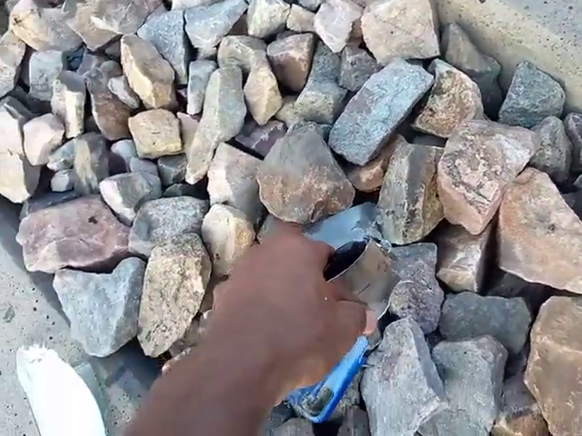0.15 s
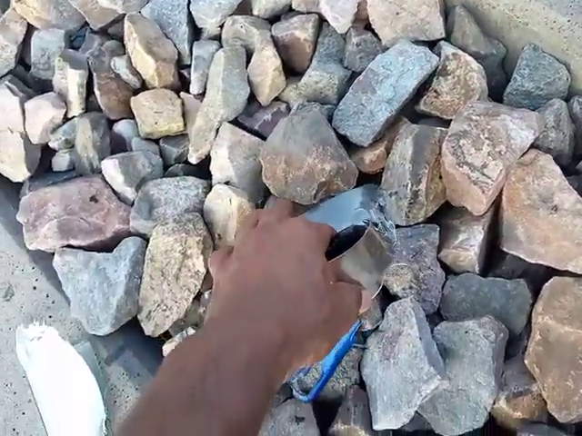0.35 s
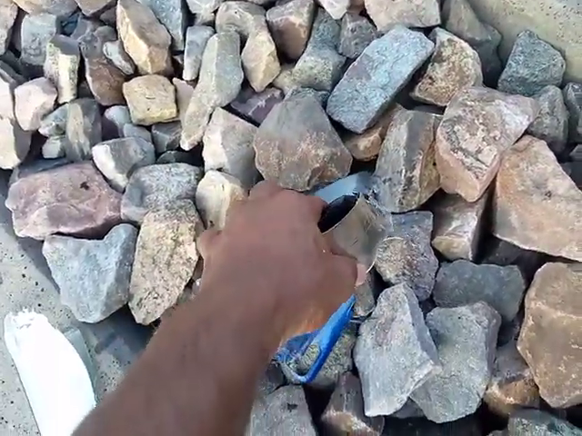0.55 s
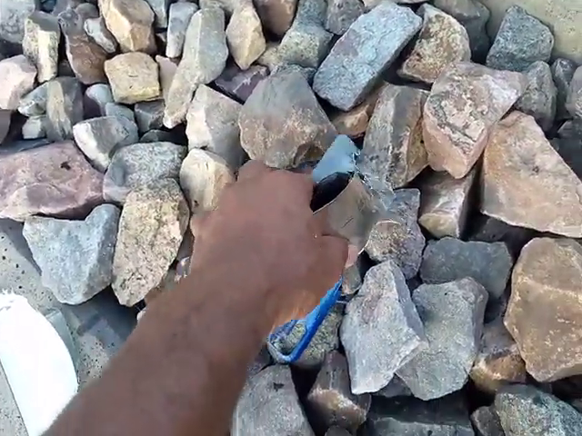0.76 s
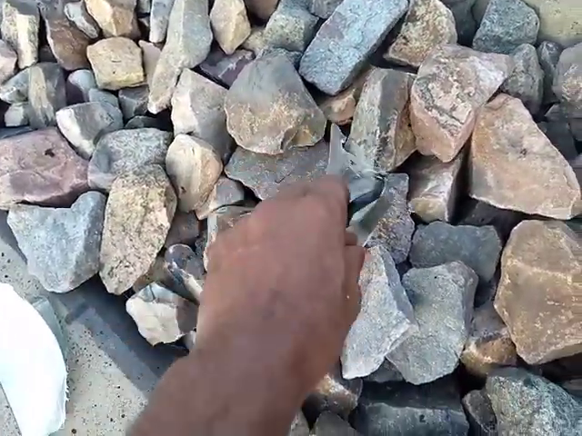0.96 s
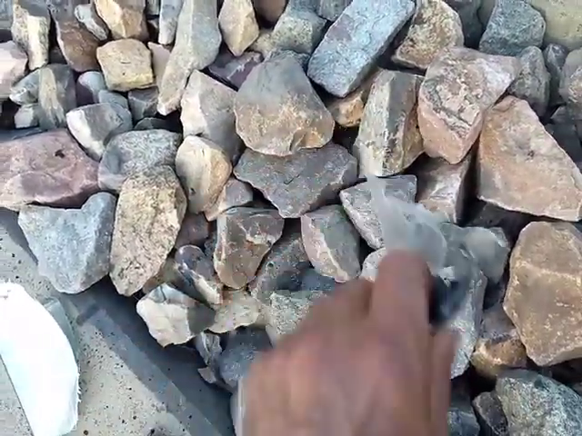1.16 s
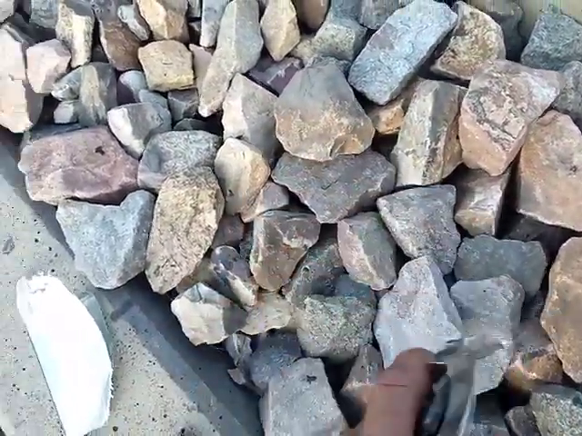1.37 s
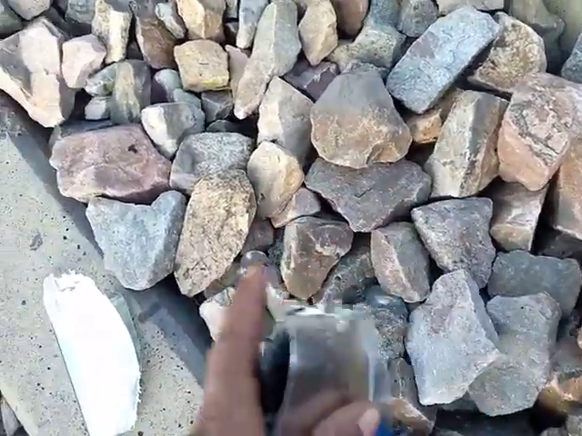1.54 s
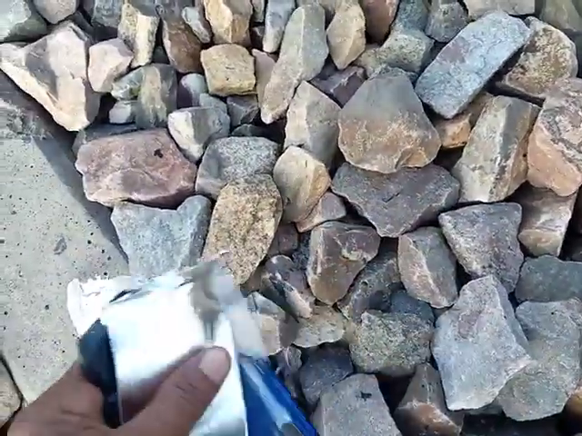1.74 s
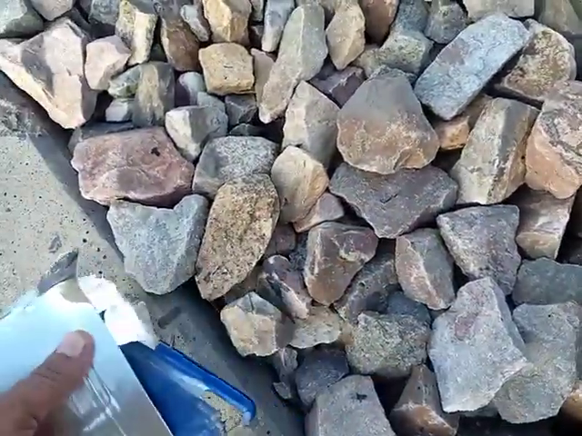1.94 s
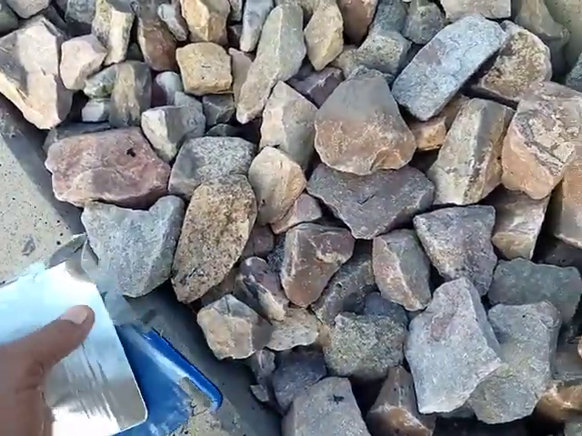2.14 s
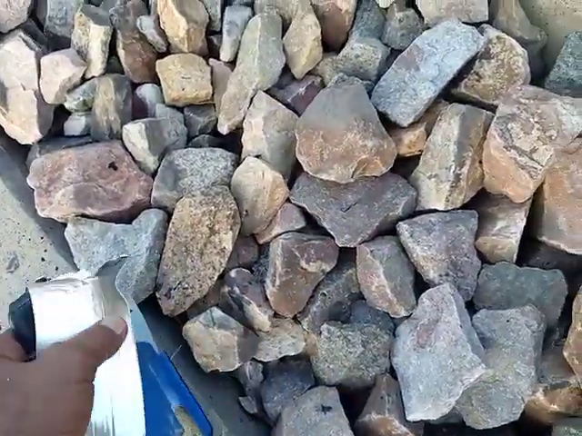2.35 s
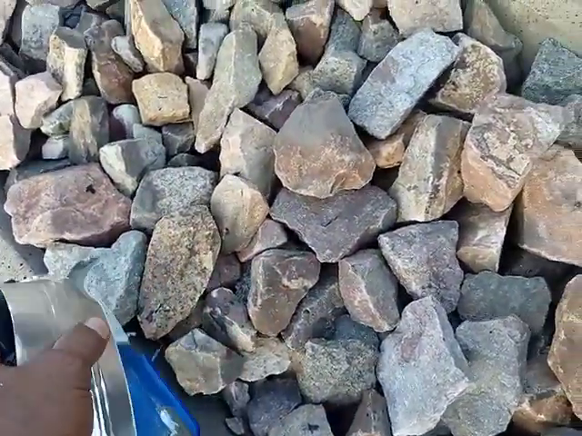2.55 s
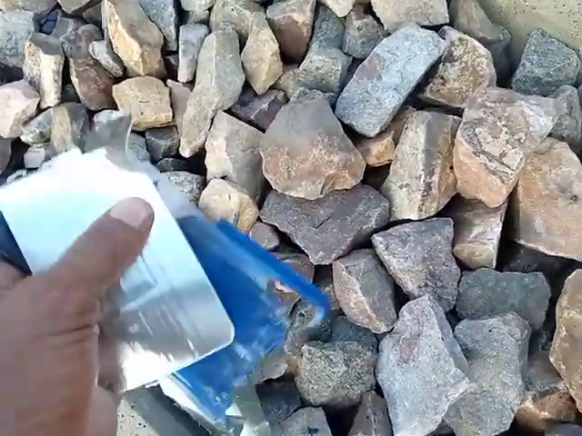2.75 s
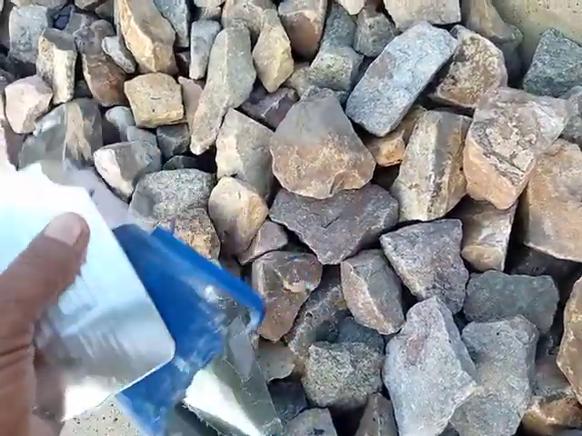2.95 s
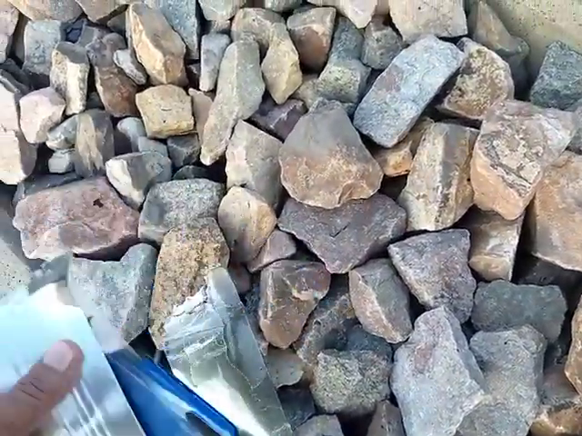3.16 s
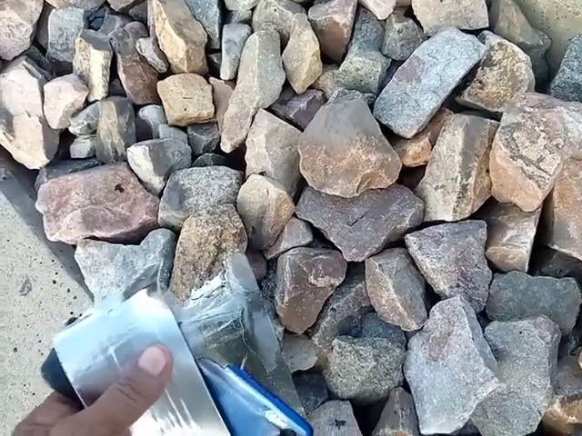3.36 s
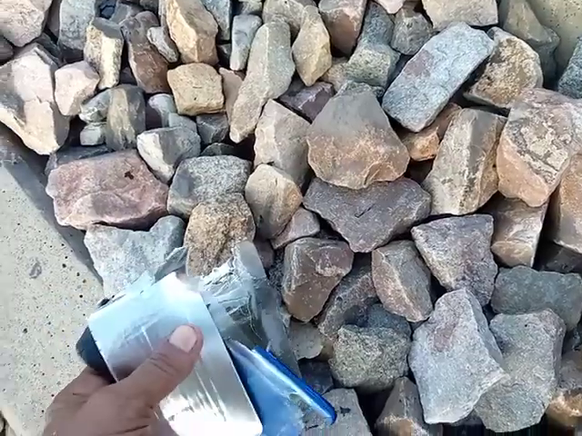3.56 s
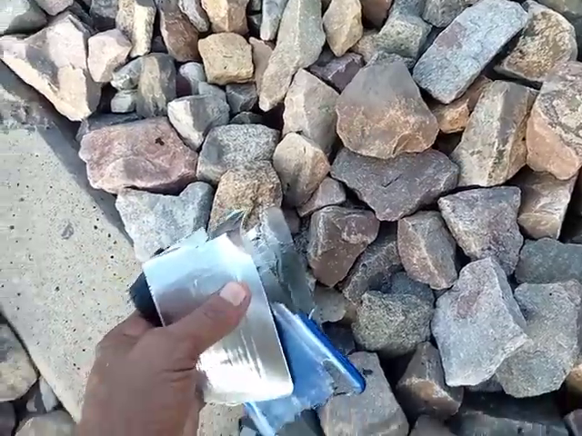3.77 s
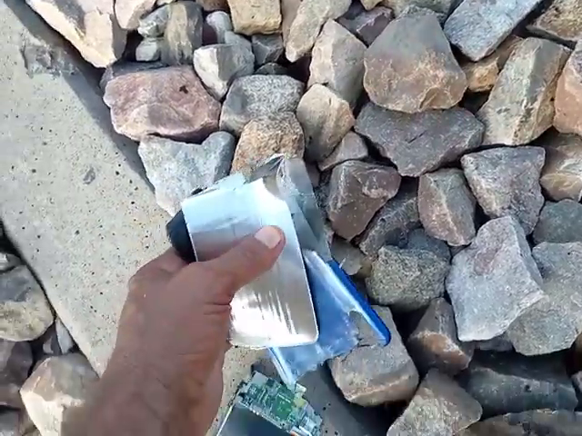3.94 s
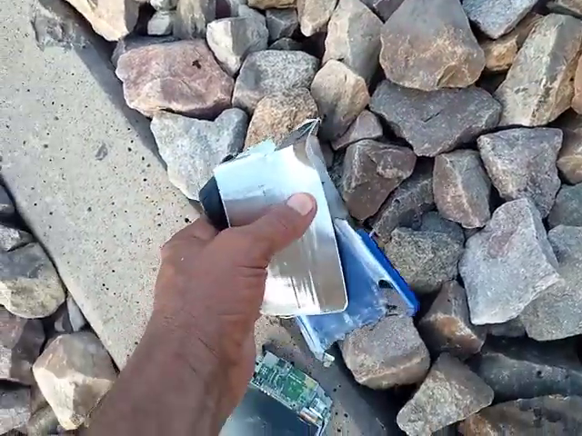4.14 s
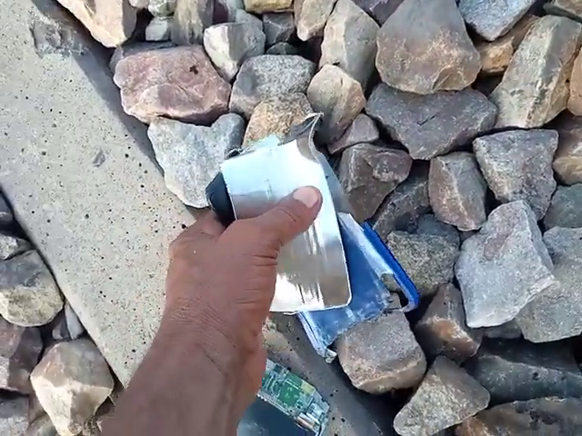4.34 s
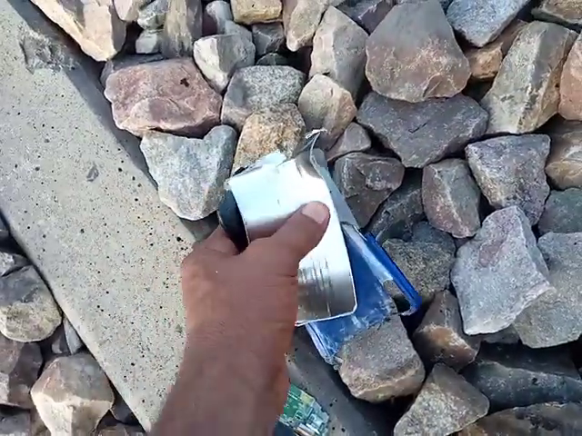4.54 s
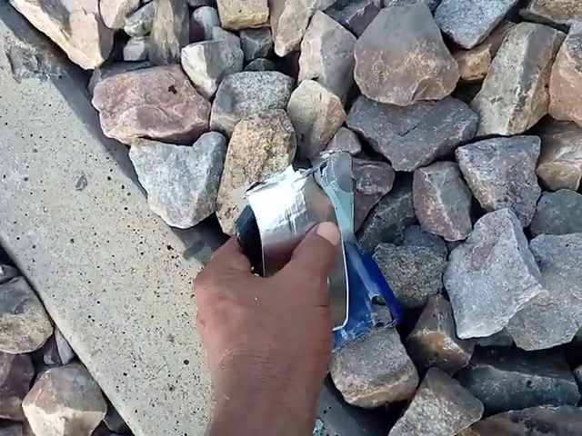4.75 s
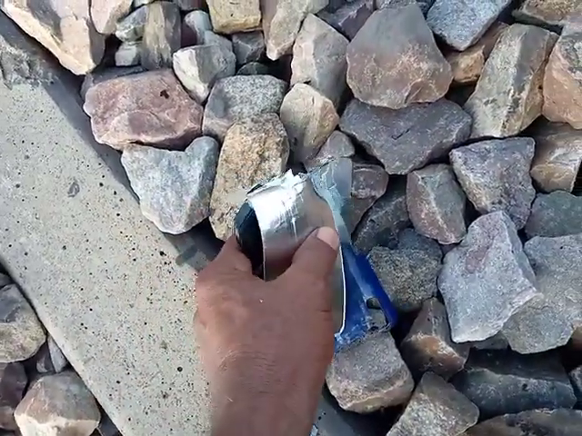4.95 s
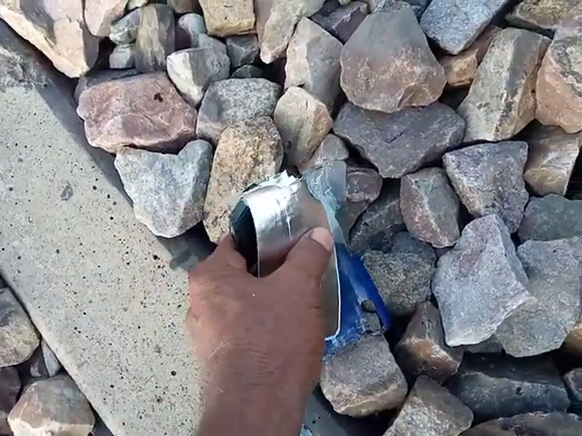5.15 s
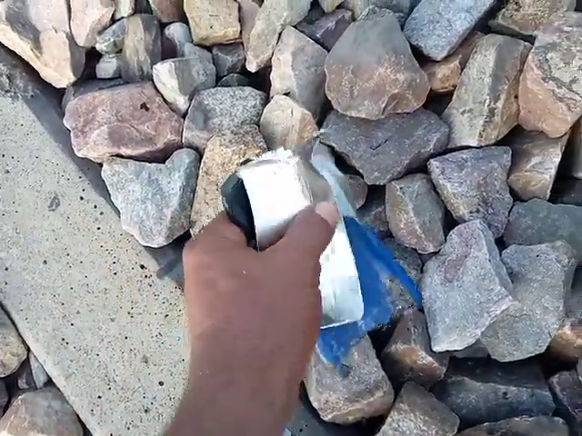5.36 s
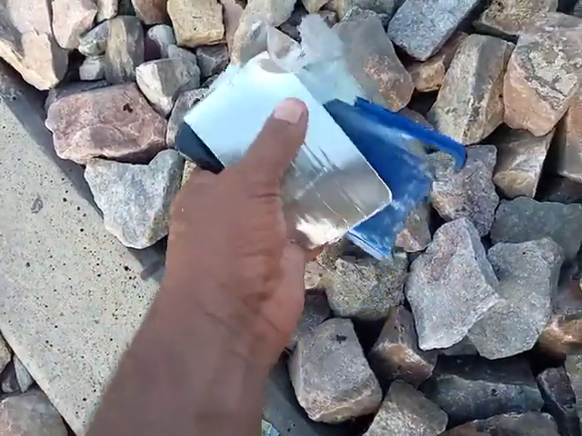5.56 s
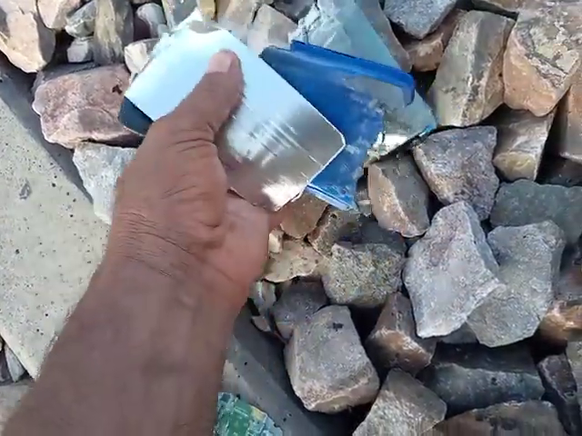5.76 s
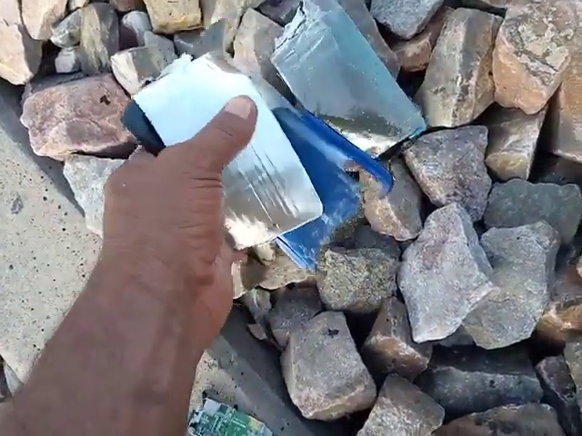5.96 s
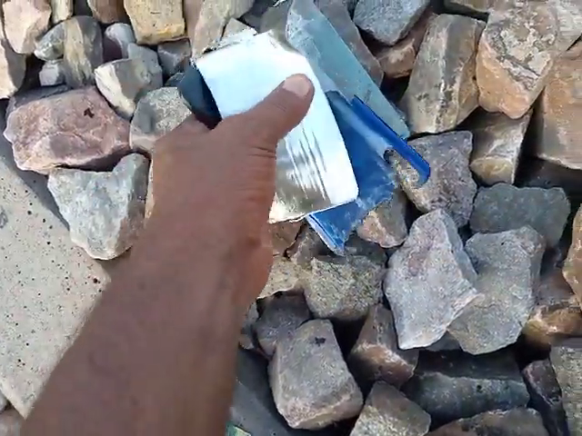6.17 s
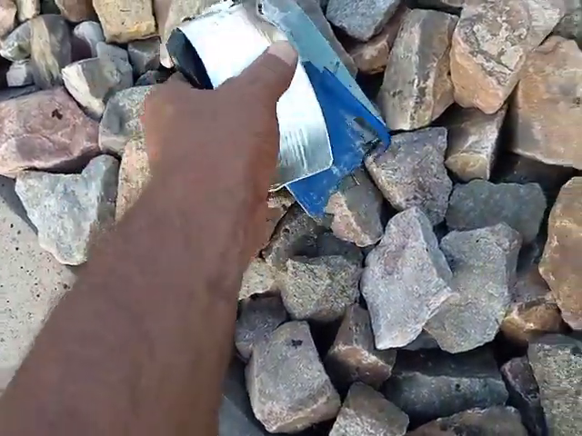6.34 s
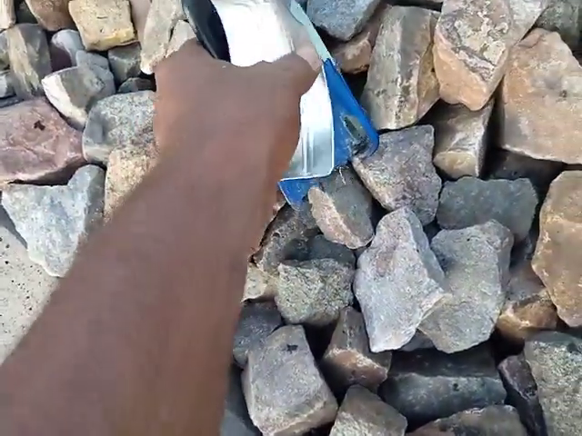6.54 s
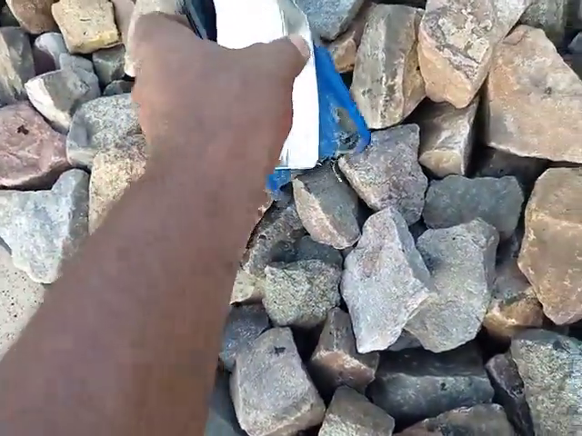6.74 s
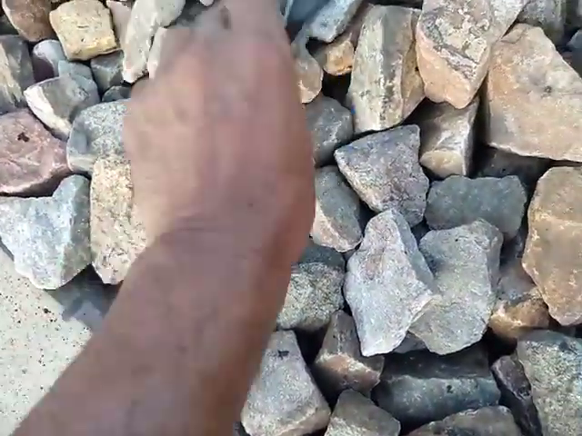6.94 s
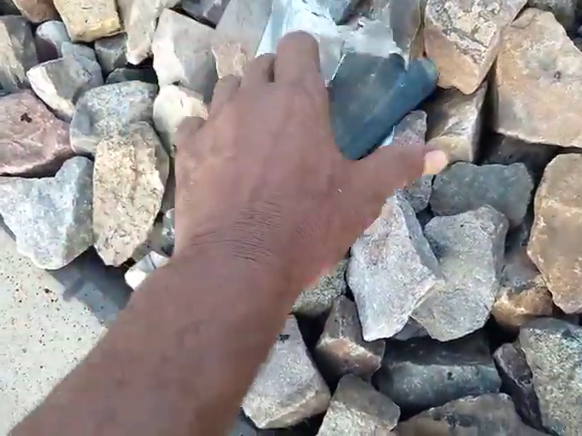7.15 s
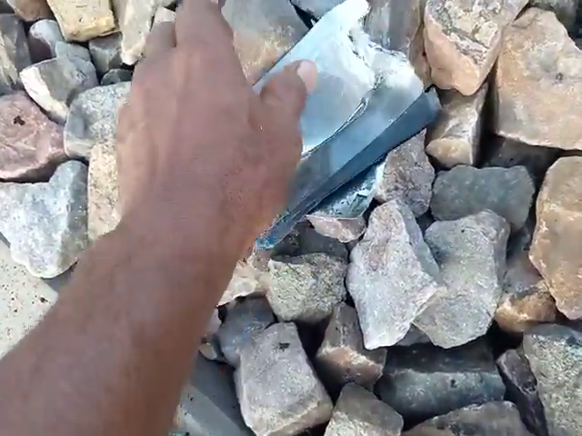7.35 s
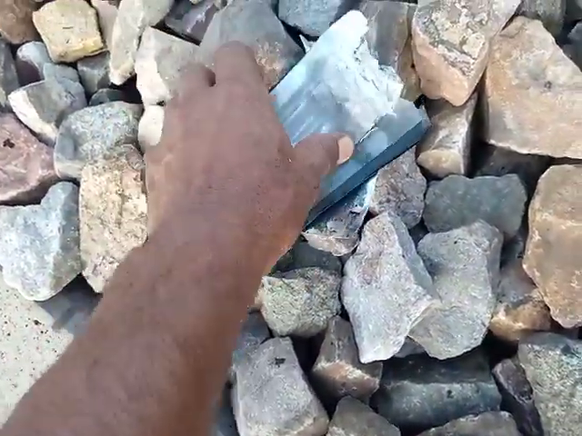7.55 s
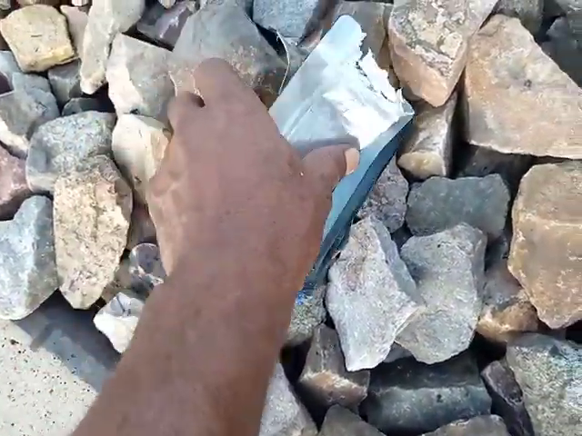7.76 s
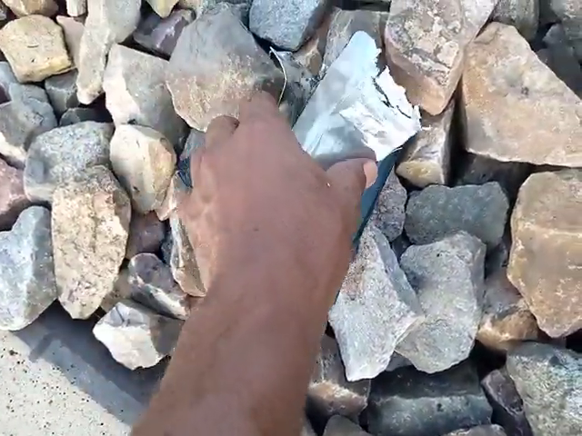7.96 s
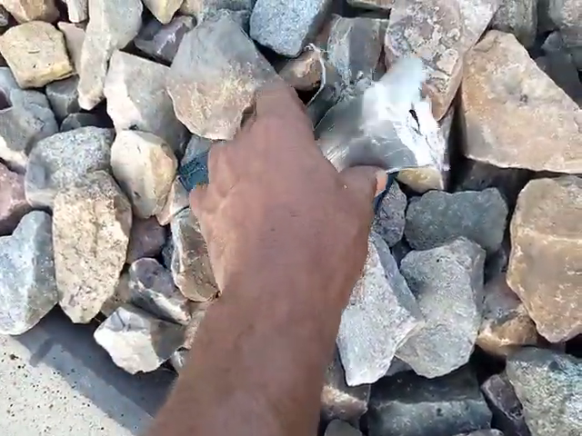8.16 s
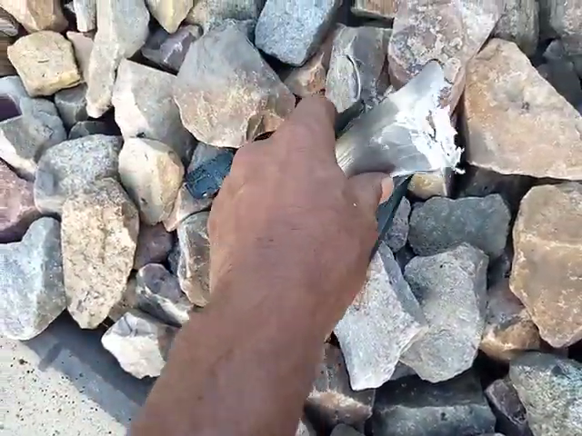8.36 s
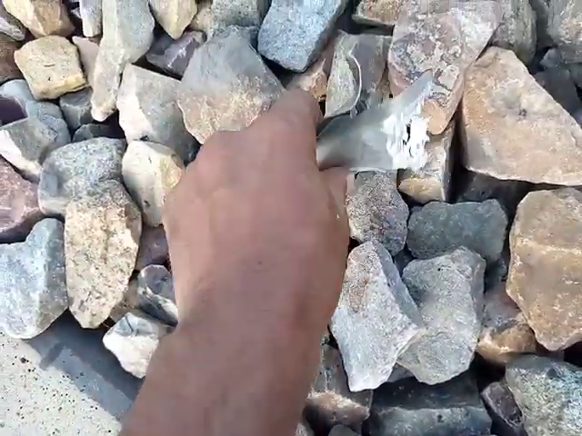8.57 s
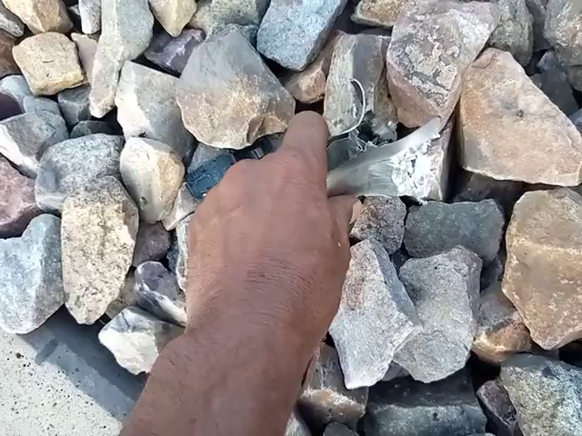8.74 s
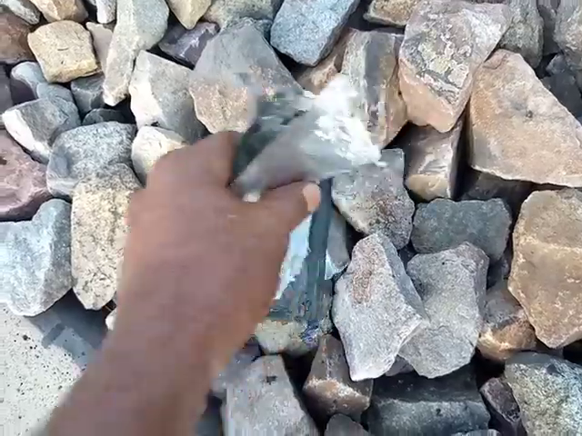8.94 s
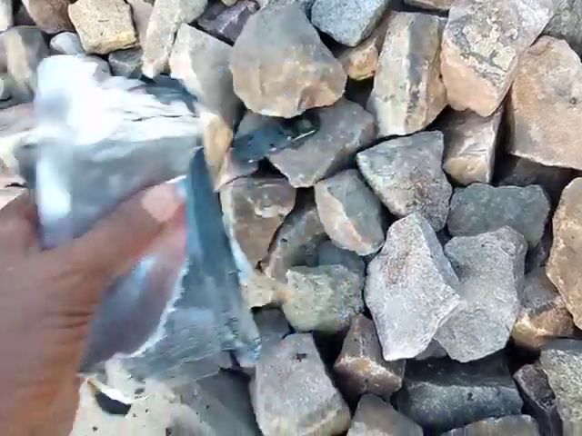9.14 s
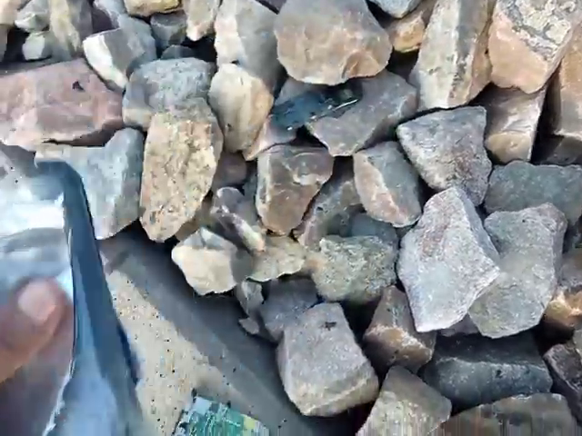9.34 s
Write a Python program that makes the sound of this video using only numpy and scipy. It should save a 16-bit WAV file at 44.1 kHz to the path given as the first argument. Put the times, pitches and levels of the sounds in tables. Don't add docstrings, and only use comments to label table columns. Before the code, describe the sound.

Crumpled foil and thin metal crackle in the hand over railway stones: an opening snap, small creaks and rubbing, a sharp cluster of pops, long near-quiet with faint rustles, then loud clacks with brief rings and more crunching to the end. Low wind, thin insect shimmer and late cricket trills remain soft. Dry, close phone sound with noise suppression and little treble.

```python
import sys
import numpy as np
from scipy import signal
from scipy.fft import rfft, irfft, next_fast_len
from scipy.io import wavfile
from scipy.ndimage import uniform_filter1d, map_coordinates

SR = 44100
rng = np.random.default_rng(int(sys.argv[2]) if len(sys.argv) > 2 else 0)


def makeup_ratio(level_db):
    decades = np.asarray(level_db, float) / 20
    return 10 ** decades


def dump(signal):
    limited = np.clip(np.atleast_2d(signal).T, -1, 1)
    pcm = np.round(limited * 32767).astype(np.int16)
    wavfile.write(sys.argv[1], SR, pcm)


N = 414540
SIZE = next_fast_len(N + 8192, True)
HZ = np.fft.rfftfreq(SIZE, 1 / SR)


def unit(x):
    return x / np.sqrt(np.mean(np.abs(x) ** 2) + 1e-20)


def curves(rows):
    s, *cols = np.transpose(rows)
    return [np.interp(np.arange(N) / SR, s, c) for c in cols]


def during(rows):
    return (np.arange(N) > rows[0][0] * SR) & (np.arange(N) < rows[-1][0] * SR)


def wobble(rate):
    knots = rng.standard_normal(int(N * rate / SR) + 4)
    return map_coordinates(knots, [np.arange(N) * rate / SR], order=1)


def hiss():
    return rng.standard_normal(N) + 1j * rng.standard_normal(N)


def coloured(x, spectrum):
    hz, db = np.transpose(spectrum)
    gain_db = np.interp(np.log(HZ + 1), np.log(hz), db)
    return irfft(rfft(x, SIZE) * makeup_ratio(gain_db), SIZE)[:N]


def patchy(patchy_db, size=512):
    z = signal.stft(rng.standard_normal(N), nperseg=size)[2]
    field = uniform_filter1d(rng.standard_normal(z.shape), size=3, axis=0)
    field = uniform_filter1d(field, size=6, axis=1)
    return unit(signal.istft(z * makeup_ratio(patchy_db * unit(field)), nperseg=size)[1][:N])


def steady(x):
    return x / np.sqrt(np.abs(uniform_filter1d(np.abs(x) ** 2, size=1800)) + 1e-12)


def fuzzy(hz, width_hz, drive):
    pole = np.exp(-np.pi * width_hz / SR)
    envelope = steady(signal.lfilter([1], [1, -2 * pole, pole ** 2], drive))
    carrier = np.exp(2j * np.pi * np.cumsum(hz) / SR)
    return np.real(envelope * carrier) * 2 ** .5


# f/Hz, level/dB [dB per Hz]
RESIDUE = [(130, -26), (220, -3.5), (875, -14.5), (1780, -13), (2710, -5.5), (4250, -13), (5590, -35.5),
           (9460, -120)]


def remains():
    level_db = -75 + 1.3 * wobble(7)
    return makeup_ratio(level_db) * unit(coloured(patchy(patchy_db=2), RESIDUE))


# f/Hz, level/dB [dB per Hz]
WIND = [(13, -38), (22, -13), (81, -1.5), (157, -4.5), (193, -15), (260, -35.5), (340, -64), (570, -120)]


def wind(level_db):
    gusts_db = 0.69 * wobble(1.3) + 4.1 * wobble(14)
    return makeup_ratio(level_db + gusts_db) * unit(coloured(rng.standard_normal(N), WIND))


# f/Hz, level/dB [dB per Hz]
CHORUS = [(3900, -46), (4300, -14), (4650, -2.5), (5760, -0.5), (6140, -12), (6900, -19.5), (7500, -35.5),
          (15100, -120)]


def insects(chorus_db, singers_db):
    strokes = 1 + 0.33 * np.sin(2 * np.pi * np.cumsum(350 + 3 * wobble(6.5)) / SR)
    note = fuzzy(5620 + 40 * wobble(2.5), 60, hiss())
    singers = makeup_ratio(singers_db + 2.8 * wobble(5.4)) * strokes * note
    far = unit(coloured(patchy(patchy_db=1.5), CHORUS))
    return singers + makeup_ratio(chorus_db + 0.98 * wobble(5.9)) * strokes * far


# t/s, chorus level/dB, wind level/dB, nearest singers level/dB
AMBIENCE = [(0, -66, -73.5, -71), (2.15, -68.5, -75, -76.5), (2.4, -63.5, -78, -63.5),
            (2.7, -57, -76, -57.5), (3.06, -64.5, -76.5, -70), (4.5, -65, -76, -74.5),
            (5.84, -66, -72.5, -72.5), (6.99, -65, -78, -71.5), (7.35, -70, -72, -87.5),
            (8.6, -70.5, -73.5, -87.5), (9.4, -67.5, -72.5, -72)]


def ambience():
    chorus_db, wind_db, singers_db = curves(AMBIENCE)
    return insects(chorus_db, singers_db) + wind(wind_db) + remains()


# t/s, wing f/Hz, level/dB
CRICKET = [
    (7.3, 5364, -63.5),
    (7.55, 5444, -71.5),
    (7.79, 5500, -59),
    (8, 5437, -68.5),
    (8.5, 5540, -66),
    (8.57, 5510, -66),
]
# t/s, level/dB
BUZZER = [
    (5.3, -89),
    (6.05, -68.5),
    (6.2, -75),
    (6.55, -64.5),
    (7.1, -70),
    (7.2, -99),
    (8.8, -99),
    (8.83, -63),
    (9.4, -65),
]


def crickets():
    t = np.arange(N) / SR
    hz, trill_db = curves(CRICKET)
    buzz_db = curves(BUZZER)[0]
    strokes = (t - 8.574) * (53.1 + (t - 8.574))
    trill = np.cos(np.pi * strokes) ** 2 * np.sin(2 * np.pi * np.cumsum(hz) / SR)
    buzz_strokes = 0.81 + 0.26 * np.sin(np.pi * 78 * t) ** 2
    buzz = buzz_strokes * fuzzy(np.full(N, 5120.), 170, hiss())
    return makeup_ratio(trill_db + 9.0) * during(CRICKET) * trill + makeup_ratio(buzz_db + 3.5) * during(BUZZER) * buzz


# start t/s, end t/s, level/dB, start f/Hz, end f/Hz
HOLLOW = [(0.042, 0.077, -51, 458.4, 426), (1.137, 1.342, -66.5, 430, 403), (1.28, 1.539, -72.5, 600, 494),
          (1.91, 1.971, -67.5, 599.5, 520), (2.421, 2.782, -66, 280, 419), (2.956, 3.226, -67.5, 420, 520),
          (4.409, 4.463, -67, 559.7, 399.3), (4.68, 4.805, -59, 330.4, 335.2),
          (4.861, 5.276, -67.5, 650, 328), (5.679, 5.78, -69, 402.5, 297),
          (6.666, 7.042, -62.5, 350, 506.1), (7.035, 7.111, -56, 350, 401), (7.229, 7.39, -60, 350, 402),
          (7.659, 7.979, -68.5, 400, 330), (8.447, 8.7, -70, 380, 560.4), (8.736, 8.8, -57.5, 379, 411.5),
          (8.857, 8.937, -63, 450, 401)]


def hollow():
    level, hz = np.zeros(N), np.full(N, 400.)
    for s, end, db, start_hz, end_hz in HOLLOW:
        at = slice(round(s * SR), round(end * SR))
        done = np.linspace(0, 1, at.stop - at.start)
        level[at] += makeup_ratio(db) * np.clip(np.minimum(8 * done, 4 * (1 - done)), 0, 1)
        hz[at] = start_hz + done * (end_hz - start_hz)
    rush = fuzzy(hz * np.exp(0.072 * wobble(15)), 190, hiss())
    return level * makeup_ratio(3.1 * wobble(25)) * rush


# t/s, peak level/dB, f/Hz, t60/s
PINGS = [(.334, -45.5, 3680, 0.057), (.392, -36, 3780, 0.046), (0.522, -36.5, 3760, .04),
         (.545, -52.5, 970, 0.12), (.655, -45, 3860, 0.058), (.702, -50, 703, 0.095),
         (.715, -38.5, 2810, 0.051), (0.745, -41, 2885, 0.055), (.8, -39, 2920, .05),
         (.83, -49, 1014, 0.12), (.897, -43, 3000, 0.037), (2.347, -34.5, 1388, 0.12),
         (2.838, -46, 2200, 0.1), (4.992, -48, 2690, 0.043), (5.311, -44.5, 1264, .08),
         (5.414, -49, 1930, 0.034), (6.42, -40.5, 2090, .04), (6.434, -41.5, 1470, 0.041),
         (6.55, -44, 3500, 0.1), (6.603, -41.5, 2120, 0.053), (7.232, -22.5, 3994, .08),
         (7.426, -42, 2620, .12), (7.591, -46.5, 3810, .07), (7.632, -42.5, 3224, .08),
         (7.784, -41, 2220, 0.087), (7.784, -40.5, 1746, .06), (7.912, -49, 1296, 0.11),
         (8.034, -60, 1260, 0.085), (8.063, -29, 2550, .04), (8.219, -33, 3530, 0.048),
         (8.415, -47, 2234, 0.067), (8.436, -46, 2240, 0.057), (8.74, -31, 2960, 0.066),
         (.046, -30, 995, 0.031), (.047, -31, 4055, 0.075), (.06, -56.5, 2616, 0.22),
          (1.859, -45.5, 2612, 0.088), (1.06, -51.5, 2000, 0.062), (1.264, -33, 1588, 0.031),
          (1.265, -39.5, 4240, 0.059), (1.376, -48, 2960, 0.047), (1.42, -51.5, 2833, 0.15),
          (1.452, -50, 2904, 0.11), (2.974, -33.5, 3387, 0.033), (3.001, -51, 3410, .05),
          (3.24, -48.5, 2570, 0.15), (3.74, -46.5, 2920, 0.14), (3.79, -50, 2960, 0.16),
          (4.412, -45.5, 750, 0.036), (5.585, -49.5, 1410, 0.058), (5.755, -37.5, 1955, 0.052),
          (5.806, -45, 3860, .04), (8.861, -33, 1224, 0.051), (9.157, -38.5, 1875, 0.044),
          (9.188, -51, 3350, 0.033)]


def pings():
    out, t = np.zeros(N + SR), np.arange(SR // 5) / SR
    swell = 1 - np.exp(-t / .0022)
    for s, db, hz, t60 in PINGS:
        drift = 0.027 * np.sqrt(hz / 3000) * np.cumsum(rng.standard_normal(len(t)))
        decay = makeup_ratio(db + 3.0 - 60 * t / max(t60, .01))
        out[round(s * SR):][:len(t)] += decay * swell * np.sin(2 * np.pi * hz * t + drift)
    return out[:N]


# t/s of the peak, peak level/dB, f/Hz
POPS = [(.502, -26, 2717), (.513, -32, 2807), (.52, -31.5, 2817), (.556, -34.5, 2710), (.663, -39, 2770),
        (.751, -42, 4134), (.784, -41.5, 2842), (0.799, -41, 4260), (0.834, -44, 4170), (.853, -42, 3000),
        (2.357, -35, 2680), (2.384, -33.5, 2013), (2.403, -31.5, 2755), (2.441, -32, 1914),
        (2.447, -37, 4190), (2.448, -29, 2050), (2.487, -32.5, 2600), (2.545, -15, 2670),
        (2.593, -39.5, 2670), (2.644, -23.5, 2640), (2.732, -32, 3340), (2.805, -45, 2153),
        (5.353, -47, 1722), (5.69, -38, 3963), (6.232, -36.5, 2740), (7.036, -26.5, 3424),
        (7.056, -33, 1850), (7.247, -21.5, 2870), (7.272, -25.5, 2067), (7.274, -27, 3962),
        (7.283, -31, 2024), (7.33, -35.5, 2590), (7.679, -42, 1206), (7.704, -38, 3143),
        (7.896, -32.5, 3207), (8.06, -40, 3380), (8.066, -29.5, 3296), (8.222, -34, 4737),
        (8.223, -38, 1260), (8.245, -38.5, 2400), (8.71, -39, 1205), (8.855, -33.5, 2930),
        (8.87, -26, 2860), (9.35, -33, 2440), (9.349, -32.5, 3670)]
POP_RISE_S, POP_FALL_S = 0.0011, .0035


def pops():
    out, t = np.zeros(N + SR), np.arange(-SR // 50, SR // 50) / SR
    swell = np.exp(-(t / np.where(t < 0, POP_RISE_S, POP_FALL_S)) ** 2 / 2)
    for s, db, hz in POPS:
        out[round((s + t[0]) * SR):][:len(t)] += makeup_ratio(db) * swell * np.sin(2 * np.pi * hz * t)
    return out[:N]


# t/s, peak level/dB, ring f/Hz
SNAPS = [(0.0468, -23, 2841), (0.3915, -22, 2700), (0.4998, -32.5, 2530), (1.2645, -23, 2856),
         (2.3241, -40, 2640), (2.4773, -21, 2776), (2.5242, -18.5, 2795), (2.5441, -31, 3638),
         (2.6209, -30.5, 2740), (2.6424, -20, 2473), (2.7307, -17, 2700), (2.798, -37, 2689),
         (2.8389, -32.5, 3680), (2.9751, -35.5, 3417), (4.4119, -38, 2073), (5.3363, -29.5, 3680),
         (5.686, -21, 1843), (6.2128, -39, 2624), (6.7925, -24.5, 1926), (7.0354, -23, 3262),
         (7.2315, -19.5, 3434), (8.0646, -29, 3470), (8.1479, -32, 2301), (8.2192, -31, 3082),
         (8.5644, -31, 2215), (8.7081, -22, 1910), (8.8608, -16.5, 2816), (9.1586, -44, 3000)]
# t/s, peak level/dB, ring f/Hz
MORE_SNAPS = [(0.3613, -42, 2070), (0.4615, -31.5, 2660), (0.6600, -39, 3128), (0.7096, -36.5, 2920),
              (2.4446, -21, 2684), (2.555, -16, 2660), (3.2331, -34.5, 2090), (1.865, -39.5, 2609),
              (4.2042, -43, 2040), (4.6879, -40, 3900), (4.7735, -36, 2030), (6.1315, -53.5, 3121),
              (7.635, -34.5, 3169), (7.656, -26, 3103), (7.7827, -46, 3470), (8.1657, -28, 2425),
              (8.46, -30.5, 2183), (8.52, -31.5, 1890), (8.6906, -42.5, 2988), (8.751, -17.5, 3210),
              (8.8969, -24.5, 3037), (4.044, -50, 3574)]
# t/s, peak level/dB, ring f/Hz
EXTRA_SNAPS = [(.887, -45, 3200), (2.3367, -38, 2700), (2.3612, -31, 2790), (2.4011, -21, 1945),
               (2.4994, -26, 2940), (2.6615, -20, 2957), (2.699, -23, 3476), (4.435, -41, 2030),
               (4.656, -47.5, 2198), (5.213, -43.5, 1730), (5.317, -40, 1890), (6.3814, -42, 1860),
               (6.561, -30.5, 2470), (6.6887, -33.5, 2010), (6.7271, -41, 3320), (6.7576, -34, 2350),
               (6.8603, -40, 2340), (7.0946, -28, 2710), (7.1744, -40, 2020), (7.238, -18, 2885),
               (7.274, -17.5, 3303), (7.289, -18, 3000), (8.2969, -50, 3000), (8.5413, -38, 3010),
               (8.6406, -46, 2690), (8.7635, -24.5, 2426), (5.998, -54, 3750), (0.051, -20.5, 2570),
               (2.022, -42, 2140), (2.162, -48.5, 2430), (5.133, -51, 2760), (5.351, -33, 2104),
               (5.556, -40.5, 2094), (5.583, -45.5, 3430), (5.737, -33.5, 3040), (8.985, -55, 3100),
               (9.051, -55, 1474), (9.188, -48, 1900), (9.396, -39, 2780), (9.255, -53, 3500)]


def snaps():
    out, t = np.zeros(N + SR), np.arange(SR // 20) / SR
    rise = 1 - np.exp(-t / 0.00072)
    for s, db, hz in [*SNAPS, *MORE_SNAPS, *EXTRA_SNAPS]:
        noise = rng.standard_normal((2, len(t)))
        ring = makeup_ratio(-60 * t / 0.036) * np.sin(2 * np.pi * hz * t + 0.089 * np.cumsum(noise[0]))
        crack = 0.95 * makeup_ratio(-60 * t / 0.023) * noise[1]
        out[round(s * SR):][:len(t)] += makeup_ratio(db - 6.0) * rise * (ring + crack)
    return coloured(out, [(200, -18.5), (900, -3.0), (4200, 2.0), (5500, -13.0), (7000, -37), (9000, -58.5)])


# t/s, peak level/dB, fall by SPAN_DB/s, larger folds' share/dB
BLOWS = [(.393, -32, .036, -9), (.654, -46.5, .26, -18), (1.266, -37, .044, -4), (4.688, -48, .05, -4.5),
         (4.41, -51, .07, -2), (5.684, -39, .045, -6), (.0465, -25, .046, -4), (1.785, -56.5, .23, -3.5),
         (2.556, -29, .025, -9), (2.644, -28, .04, -7), (2.674, -26.5, .0334, -4), (2.798, -44, .07, -14),
         (2.976, -50.5, .29, -4), (4.14, -59.5, .65, -26), (6.548, -47, .2, -6),
         (2.658, -24.5, .0427, -6.5), (6.687, -50, .42, -4.5), (6.792, -38.5, .03, -8.5),
         (7.233, -22, .2, -8), (7.592, -49, .3, -8), (7.783, -44.5, .17, -10), (8.165, -41, .08, -8),
         (8.564, -46, .05, -7.5), (9.157, -55, .12, -3), (9.348, -36, .06, -12)]
# peak t/s, peak level/dB, rise/s and fall/s by SPAN_DB, larger folds' share/dB
SQUEEZES = [(1.063, -57, .15, 0.0267, -3), (2.02, -55, 0.098, 0.1009, -0.5),
            (2.372, -35, 0.05935, .3, -6.5), (2.455, -31, 0.1, 0.01, -9), (2.504, -33, 0.11, 0.01205, -4),
            (2.622, -37, 0.06014, .03, -5), (2.741, -33.5, .021, 0.03406, -3),
            (5.014, -56, 0.51, 0.82, -4.5), (5.346, -38, 0.04, 0.06, -4), (5.319, -45.5, 0.026, .03, -2.5),
            (5.416, -51, 0.21, 0.1, -5), (5.594, -54.5, 0.12, 0.05, -1), (5.742, -38, 0.044, .075, -9.5),
            (6.226, -33.5, 0.025, .035, -6), (6.436, -49, 0.14, .05, -5),
            (7.046, -29.5, 0.021, 0.05, -11.5), (7.222, -39.5, 0.22, 0.013, -3.5),
            (7.69, -39, .13, .075, -8.5), (8.068, -38, 0.036, .065, -5.5),
            (8.223, -34.5, 0.025, 0.062, -14), (8.305, -52.5, 0.083, 0.018, -6.5),
            (8.757, -28, 0.089, .055, -4.5), (8.866, -29, 0.022, 0.058, -5),
            (9.345, -56.5, 0.2, .012, -5.5), (9.398, -50, 0.015, 0.011, -3)]
# t/s, length/s, level/dB, larger folds' share/dB, freest mode f/Hz
RUBS = [(.362, 0.025, -50, -5, 2857), (.43, 0.065, -54.5, -4.5, 2760), (.49, 0.08, -45.5, -9.5, 2800),
        (.701, .215, -45.5, -9.5, 2891), (0.934, 0.37, -63.5, -3.5, 2477), (1.37, 0.12, -60, -6.5, 2858),
        (1.483, .38, -65, -2, 2608), (1.912, 0.03997, -52.5, -5, 2687), (1.959, .36, -64, -3, 2546),
        (2.328, 0.24, -43, -3, 2640), (2.561, 0.051, -50, -4.5, 2670), (2.869, 0.4, -62.5, -3, 3189),
        (3.233, 0.052, -52, -4.5, 2570), (3.728, .15, -55, -39, 2920), (3.89, 0.8, -67, -9, 2654),
        (4.72, 0.087, -57.5, -5.5, 2862), (5.782, .045, -56, -10, 3900), (6.25, 0.093, -55, -25, 3769),
        (6.443, 0.12, -50.5, -7.5, 3638), (6.682, 0.34, -56, -3.5, 2990), (7.045, 0.058, -36.5, -6.5, 2774),
        (7.357, .105, -54, -7, 2526), (7.489, .08, -60, -6.5, 3419), (7.753, .03, -50, -8, 3330),
        (7.901, .05, -50, -7, 3300), (8.46, 0.096, -55.5, -6, 2280)]
SPAN_DB = 30
BLOW_RISE_S, RUB_RISE_S, RUB_FALL_S, RUB_SAG_DB = .003, 0.011, .028, 2
IDLE_DB, IDLE_FOLDS_DB = -72, -9
STIFF_HZ = 2400


def hand():
    t = np.arange(N) / SR
    rings = np.array([(s, hz) for s, _, hz in [*SNAPS, *MORE_SNAPS] if hz > STIFF_HZ])

    def ring_hz(s):
        return rings[np.argmin(np.abs(rings[:, 0] - s)), 1]

    moves = [(s, 0, db, 0, BLOW_RISE_S, fall, folds, ring_hz(s)) for s, db, fall, folds in BLOWS]
    moves += [(s, 0, db, 0, rise, fall, folds, ring_hz(s)) for s, db, rise, fall, folds in SQUEEZES]
    moves += [(s, hold, db + RUB_SAG_DB / 2, RUB_SAG_DB, RUB_RISE_S, RUB_FALL_S, folds, hz)
              for s, hold, db, folds, hz in RUBS]
    level_db, folds_db = np.full(N, IDLE_DB * 1.), np.full(N, IDLE_FOLDS_DB * 1.)
    mode_hz = np.full(N, 2800.)
    for s, hold, db, sag, rise, fall, folds, hz in moves:
        begin, end = s - 2 * rise, s + hold + 2 * fall
        at = slice(max(round(begin * SR), 0), round(end * SR))
        corners_db = [db - 2 * SPAN_DB, db, db - sag, db - sag - 2 * SPAN_DB]
        shape = np.interp(t[at], [begin, s, s + hold, end], corners_db)
        wins = np.flatnonzero(shape > level_db[at]) + at.start
        level_db[wins], folds_db[wins], mode_hz[wins] = shape[wins - at.start], folds, hz
    return level_db, folds_db, mode_hz


def modes(table, between_db):
    response = makeup_ratio(between_db)
    for k, (centre, width, db) in enumerate(table):
        peak = 1j * HZ * width / (centre * centre - HZ * HZ + 1j * HZ * width)
        response = response + (-1) ** k * makeup_ratio(db) * peak
    return response


def buckling():
    draw = rng.random((14000, 3))
    start = (draw[:, 0] * N).astype(int)
    size = makeup_ratio(-2.3 * np.log(draw[:, 1]) + 4.7 * wobble(90)[start])
    clicks = unit(np.bincount(start, size * np.cos(2 * np.pi * draw[:, 2]), N))
    rub = makeup_ratio(3.5 * wobble(60)) * patchy(patchy_db=5.5, size=1024)
    return start, size, 0.66 * clicks + 0.69 * rub


# f/Hz, width/Hz, level/dB
FRAME = [(666, 22, -27.5), (1014, 100, -4.5), (1452, 44, -6.5), (2040, 120, -6.5), (2700, 69, -7),
         (2920, 60, 0.5), (3344, 110, -11.5), (3770, 78, -4.5), (4150, 46, -7.5)]
BUNDLE = [(1345, 83, -15), (2115, 60, -8.5), (2640, 870, -22.5), (3920, 120, -12.5)]
FOLDED = [(1890, 230, -10.5), (2660, 240, -5), (3123, 170, -6), (3530, 170, -10.5), (3900, 41, 0)]
PLATE = [(1175, 69, -11.5), (2090, 200, -3), (2570, 37, -6.5), (2780, 130, -9), (3096, 67, -11.5),
         (3420, 32, -4), (3940, 18, -6), (4430, 7.4, -2)]
# from t/s, modes, level of the largest folds over the middle ones/dB
GRIPS = [
    (0, FRAME, -2.5),
    (1.1, BUNDLE, -5.5),
    (3.5, FOLDED, -2.5),
    (6.999, PLATE, -3.5),
    (8.65, BUNDLE, -4),
]
# f/Hz, level/dB [dB per Hz]
UPPER = [(2100, -50), (2550, -2), (4200, -5), (4500, -16.5), (5700, -37.5), (9000, -58)]
# f/Hz, level/dB [dB per Hz]
MIDDLE = [(1300, -52.5), (1650, 6.5), (2450, 3), (2900, -71)]
# f/Hz, level/dB [dB per Hz]
LOW = [(150, -17.5), (500, -15), (800, -3), (1550, -0.5), (1900, -56.5)]
# f/Hz, level/dB [dB per Hz]
EDGE = [(4300, -35.5), (4700, 3), (5600, -12), (6600, -19.5), (9000, -25)]


def crackle():
    level_db, middle_db, mode_hz = hand()
    t = np.arange(N) / SR
    power = makeup_ratio(2 * level_db) - makeup_ratio(2 * -72.5)
    level = uniform_filter1d(np.sqrt(np.clip(power, 0, None)), size=40)
    start, size, drive = buckling()
    drive_spectrum = rfft(drive, SIZE)
    grip = np.searchsorted([s0 for s0, *_ in GRIPS], t, "right") - 1
    low_db = middle_db + np.array([db for *_, db in GRIPS])[grip]
    held = [irfft(drive_spectrum * modes(table, between_db=-17.5), SIZE)[:N] for _, table, _ in GRIPS]
    rung = np.choose(grip, held)
    free_drive = np.bincount(start, size, N) * np.exp(2j * np.pi * rng.random(N))
    free = .62 * fuzzy(mode_hz, 200, free_drive)
    flat = middle_db < -22
    middle_db = middle_db + 1.7 * wobble(22)
    low_db = low_db + 1.8 * wobble(22)
    upper = np.sqrt(np.clip(1 - makeup_ratio(2 * middle_db) - makeup_ratio(2 * low_db), .04, 1))
    bands = upper * (steady(coloured(rung, UPPER)) + free)
    slide = coloured(coloured(patchy(patchy_db=2), UPPER), [(2500, -9), (2800, -5)])
    bands[flat] = steady(slide)[flat] + 1.1 * free[flat]
    bands += makeup_ratio(middle_db) * steady(coloured(rung, MIDDLE))
    bands += makeup_ratio(low_db) * steady(coloured(rung, LOW))
    bands += makeup_ratio(-6.0) * np.abs(level) ** 0.41 * steady(coloured(drive, EDGE))
    return level * bands


def suppressed(x, gate_db):
    z = signal.stft(x, nperseg=512, noverlap=384)[2]
    power = np.abs(uniform_filter1d(np.abs(z) ** 2, size=9, axis=1))
    gain = power / (power + makeup_ratio(2 * gate_db))
    return signal.istft(z * gain, nperseg=512, noverlap=384)[1][:N]


def scene():
    background = ambience() + crickets()
    pieces = hollow() + pings() + pops() + snaps()
    return (background + pieces + suppressed(crackle(), gate_db=-77.0))[None]


# f/Hz, level/dB
MIC = [(22, -15), (48, 1.5), (6000, -1.5), (7000, -6.5), (7600, -11.5), (9000, -47)]
# f/Hz, level/dB [dB per Hz]
SPRAY = [(6000, -29), (7500, 2), (9500, -15.5), (15000, -4.5), (15700, -6), (15800, -49.5)]
# f/Hz, level/dB [dB per Hz]
AIR = [(6800, -40), (7600, -0.5), (12000, -6), (15700, 2), (15800, -60)]


def microphone(x):
    strain = uniform_filter1d(np.abs(x), size=200) ** .9
    spray = makeup_ratio(-48.0) * x.std() * unit(coloured(x * strain * rng.standard_normal(N), SPRAY))
    air = makeup_ratio(-101) * unit(coloured(rng.standard_normal(N), AIR))
    return coloured(x, MIC) + spray + air


def low_pass(x):
    return signal.sosfilt(signal.butter(12, 15750, fs=SR, output="sos"), x)


def record(dry):
    heard = microphone(dry[0])
    return low_pass(heard[None])


dry = scene()
out = record(dry)
dump(out)
```